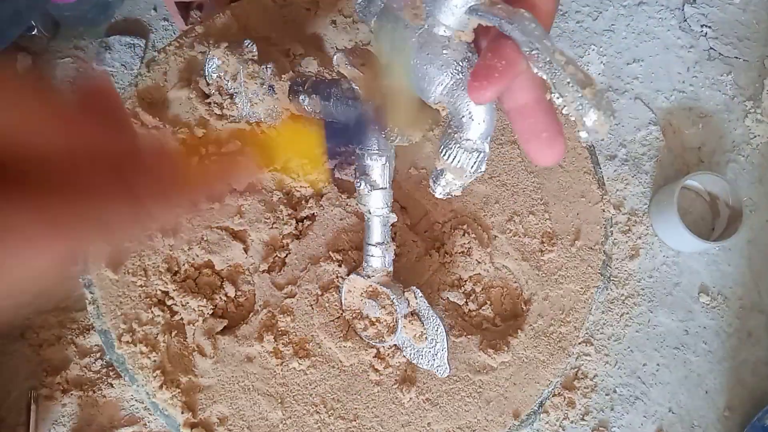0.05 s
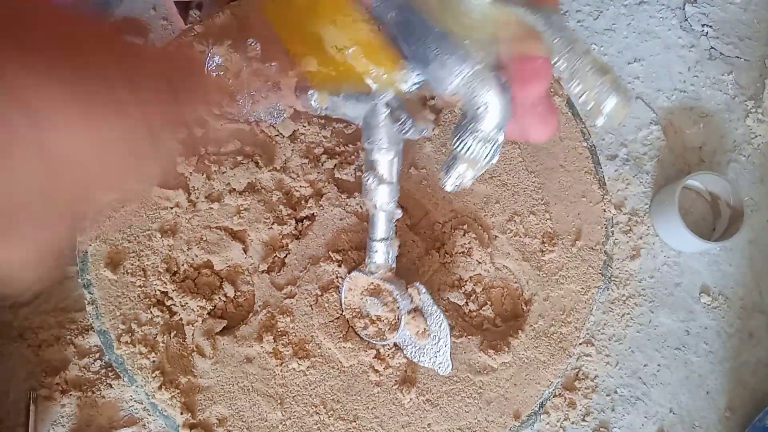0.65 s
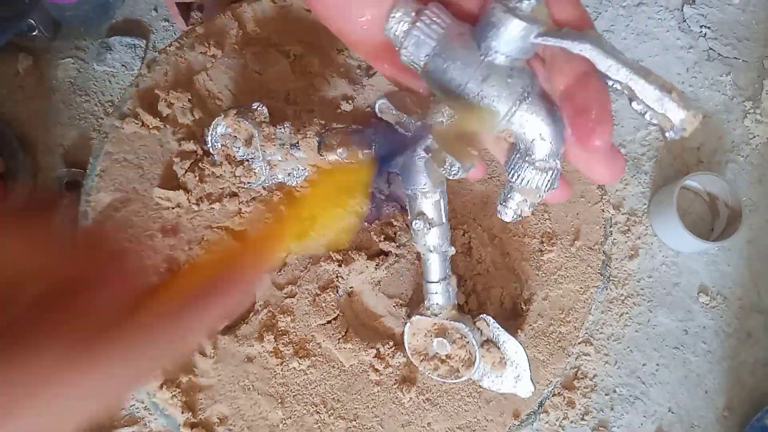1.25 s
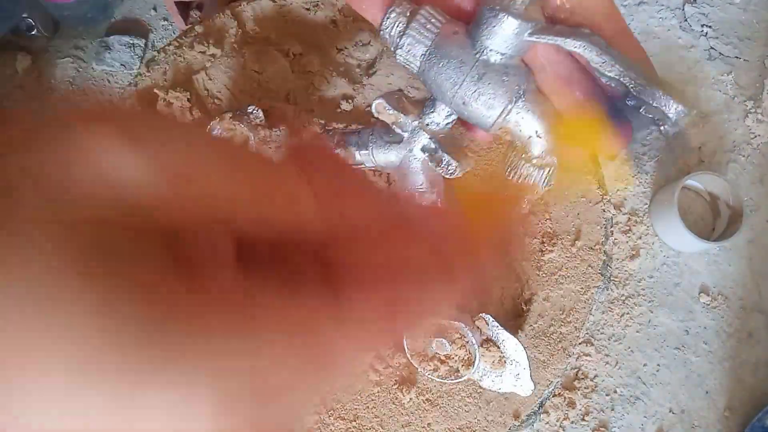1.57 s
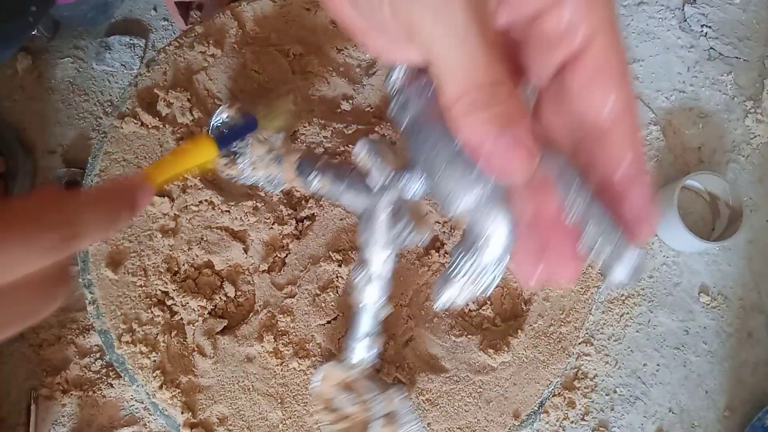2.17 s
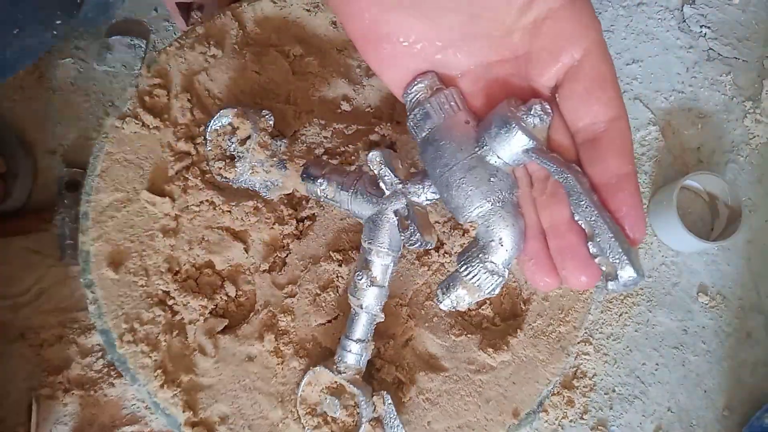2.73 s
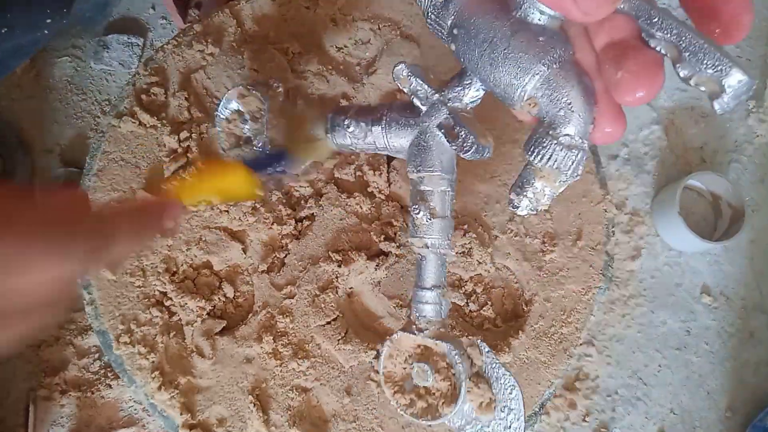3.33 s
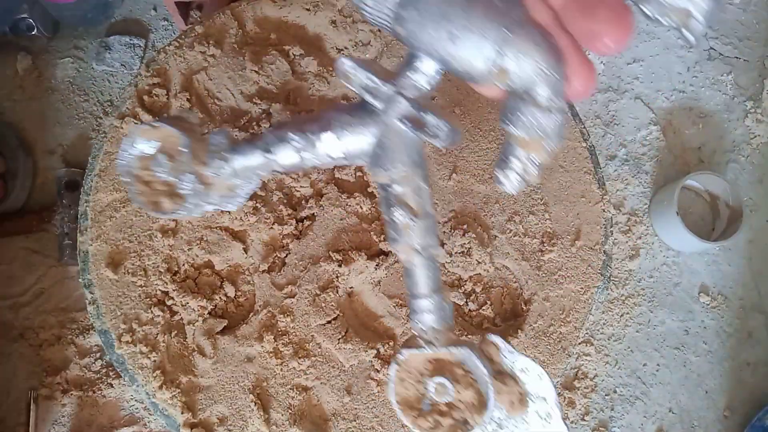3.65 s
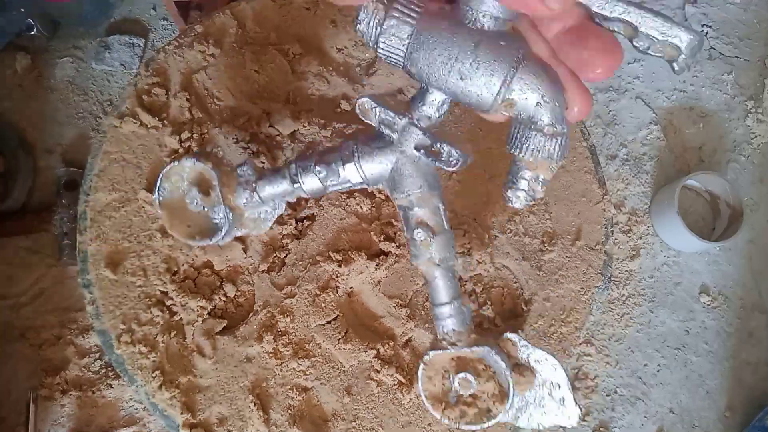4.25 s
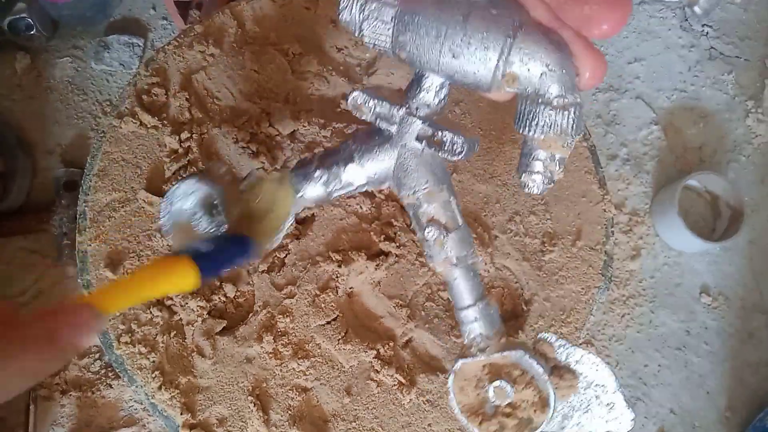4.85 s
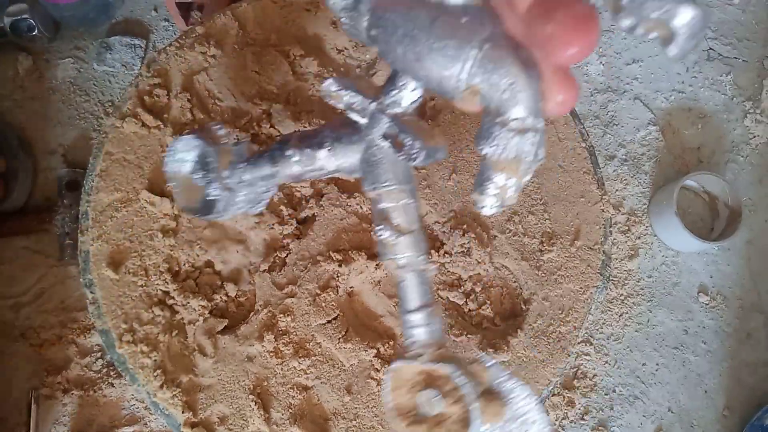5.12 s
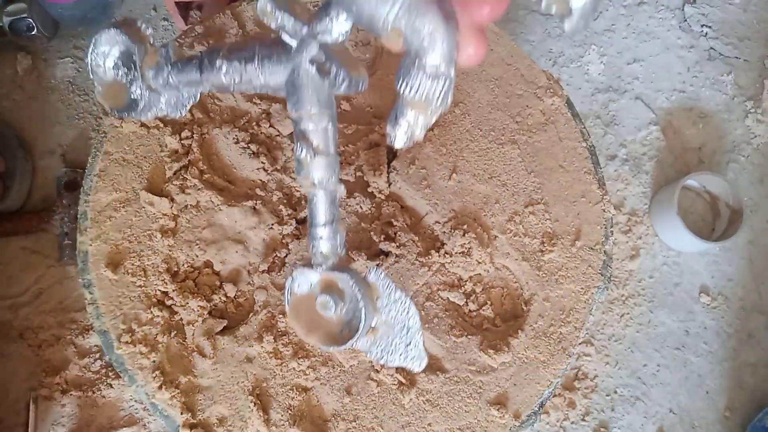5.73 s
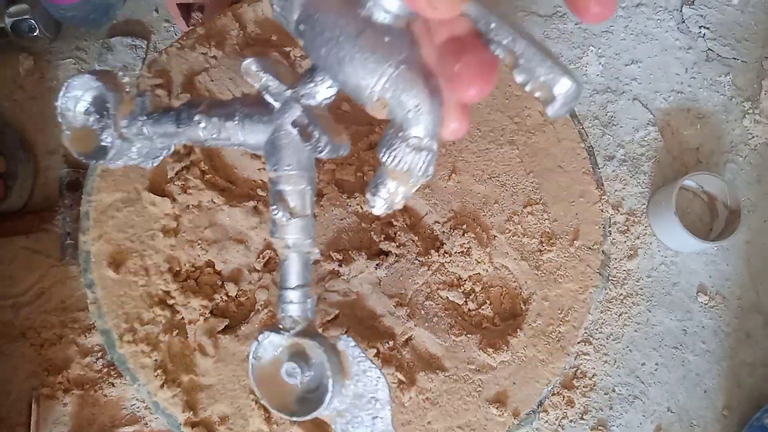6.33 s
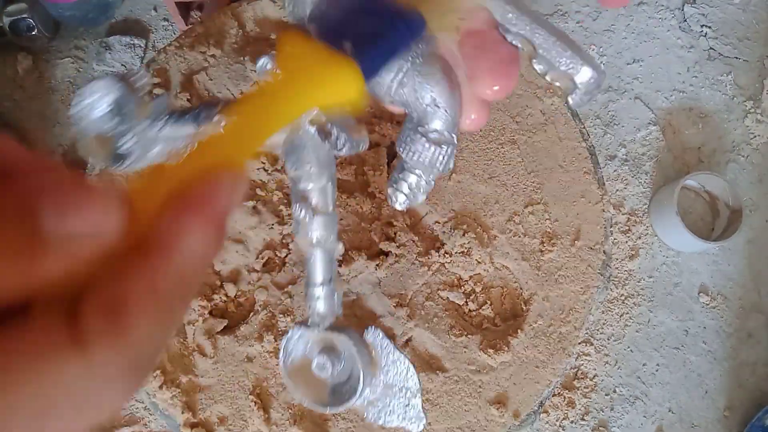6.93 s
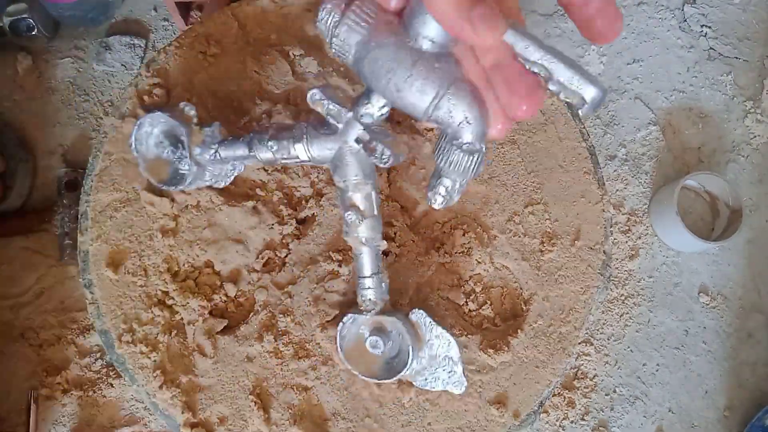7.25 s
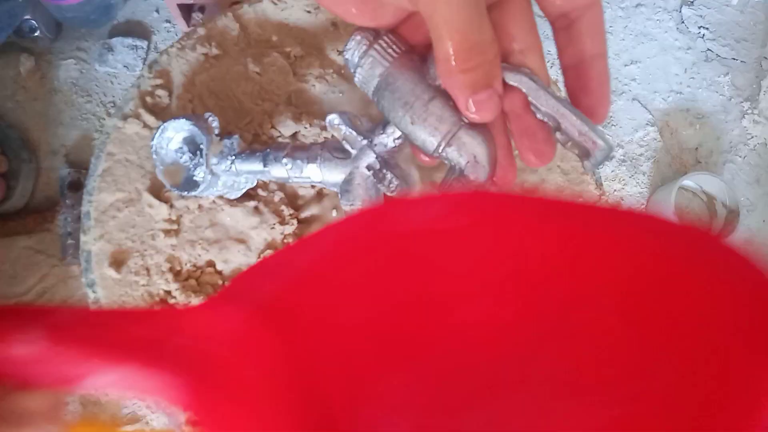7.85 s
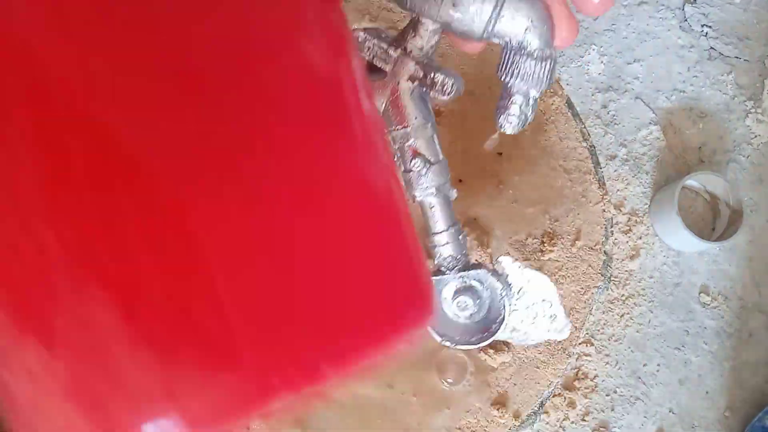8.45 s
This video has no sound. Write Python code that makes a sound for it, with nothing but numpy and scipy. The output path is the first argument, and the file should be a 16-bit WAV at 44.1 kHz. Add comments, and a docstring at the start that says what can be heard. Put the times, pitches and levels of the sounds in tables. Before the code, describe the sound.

In a small workshop, short hollow sloshes and sharp plastic knocks come again and again as a paintbrush is rinsed in a water jug. Between the dunks, its wet bristles softly rasp and flick sand off a metal casting, with a few light taps. A faint far drone rises late, and water finally splashes gently onto the casting, dripping and trickling. Everything is close and slightly muffled, over low hiss and rumble.

```python
"""A paintbrush washes moulding sand off an aluminium casting held over the sand bed.
From the start, wet bristles tap and scrub the metal, dragging grit. From 0.5 s the brush is dunked
again and again in a plastic jug, knocking the wall and churning the water, with scrubbing in between.
A far drone swells near 7 s. From 7.4 s water from the jug spatters on the casting and trickles off.
Faint hiss and rumble run throughout."""
import sys
import numpy as np
from scipy import signal
from scipy.fft import rfft, irfft, next_fast_len
from scipy.io import wavfile

SR = 44100
rng = np.random.default_rng(int(sys.argv[2]) if len(sys.argv) > 2 else 0)


def write(x):
    x = np.atleast_2d(x).T
    wavfile.write(sys.argv[1], SR, np.round(np.clip(x, -1, 1) * 32767).astype(np.int16))


N = 382788
TIME_S = np.arange(N) / SR

# Event levels are before mix gains.
# Brush churns the water. Each row: start in seconds, level in dB, rise in seconds, t60 in seconds,
# air note in Hz, relative level of spray and bubbles in dB.
DUNKS = [(0.471, -26.5, 0.022, 0.16, 540, -14), (.515, -29.5, 0.012, 0.21, 535, -2.5),
         (1.112, -21.5, 0.014, 0.3, 639, -10), (1.862, -26.5, 0.0047, 0.16, 720, -28),
         (1.883, -16, 0.0053, 0.18, 677, -6), (1.939, -30, 0.021, 0.19, 565, -10),
         (2.855, -30.5, 0.015, 0.31, 626, -8), (2.922, -28, 0.01, 0.25, 668, -3.5),
         (3.664, -18.5, 0.0035, 0.19, 733, -12), (3.718, -25, 0.0036, 0.29, 615, -3.5),
         (4.397, -37.5, 0.015, 0.22, 594, -5), (4.42, -29, 0.009, 0.34, 670, -9.5),
         (5.249, -34.5, 0.019, 0.22, 680, -13), (5.789, -33.5, 0.0024, 0.26, 674, -32),
         (5.83, -32.5, 0.033, 0.23, 680, -10), (6.366, -20.5, 0.01, 0.24, 606, -7),
         (7.295, -38, 0.026, 0.36, 621, -7.5)]
# Ferrule hits the jug. Each row: start in seconds, crack peak in dB, pitch in Hz, boom re crack in dB.
KNOCKS = [(0.4736, -21, 2140, -20), (0.5146, -8, 2010, -18.5), (1.8841, -10.5, 2090, -37),
          (1.889, -14.5, 2670, 2.5), (1.9052, -14.5, 3180, -18), (2.8552, -17.5, 1960, -10),
          (2.9193, -7.5, 3745, -11), (3.662, -4, 2940, -13), (5.2432, -23, 3080, -25),
          (5.833, -21, 3630, -25), (5.848, -17.5, 2800, -12.5), (6.3646, -6.5, 2940, -8.5),
          (6.3773, -17.5, 1860, -7)]
# Large bubbles. Each row: start in seconds, level in dB, pitch in Hz, t60 in seconds.
GULPS = [(.517, -27, 488, 0.058), (1.138, -28, 600.4, 0.19), (1.891, -23, 713, 0.05),
         (2.925, -18, 773, 0.014), (3.721, -22, 616, 0.22), (4.428, -28.5, 538, 0.16),
         (6.39, -30, 612.4, 0.2)]
# Half-full plastic jug. Each row: mode frequency in Hz, gain in dB, t60 in seconds.
JUG_MODES = [(241.6, -27.5, 0.17), (350.6, 0, 0.054), (548, -8.5, 0.059), (686, 2.5, 0.011),
             (728, 3, 0.072), (836, -12, 0.036), (1202, -2.5, 0.03), (1780, 0, 0.021), (1980, -3.5, 0.037),
             (2535, -27.5, 0.13), (2580, -32, 0.067), (3495, -2, 0.022), (3790, -8, 0.11),
             (1327, -6.5, 0.057), (4210, -10.5, 0.025)]
# Hollow jug notes. Each row: centre in seconds, half-width in seconds, level in dB, pitch in Hz,
# bandwidth in Hz.
JUG_NOTES = [(2.81, .075, -56, 620, 110), (7.885, .055, -44.5, 158, 22)]
# Scrubbing. Each row: start in seconds, length in seconds, then bristle, sand and rub levels in dB.
SCRUB_BOUTS = [(-.05, 0.42, -56, -49.5, -60.5), (0.614, 0.38, -53.5, -44.5, -54),
               (1.287, 0.48, -51.5, -51.5, -51), (2.027, .66, -52, -46, -57),
               (3.039, 0.473, -51.5, -44.5, -57.5), (3.86, 0.38, -52.5, -49.5, -52),
               (4.51, 0.38, -50, -44, -59.5), (4.862, .21, -53, -44, -58.5), (5.399, 0.35, -50.5, -45, -67),
               (5.968, .3, -51, -41.5, -55), (6.505, 0.72, -50.5, -46.5, -51.5)]
# Bristle flicks. Each row: centre in seconds, level in dB, length in seconds, pitch in Hz,
# sand re rasp in dB.
FLICKS = [(0.829, -39.5, 0.022, 3470, 8), (0.96, -33.5, 0.013, 3770, 9.5), (1.405, -41.5, 0.038, 2620, 5),
          (1.515, -32.5, 0.048, 2700, -27), (1.702, -41.5, 0.028, 2000, -5), (2.334, -43, .022, 3140, -4),
          (2.274, -41.5, .01, 2870, 0), (2.382, -39, 0.013, 3070, -5), (2.427, -35.5, 0.016, 3530, -13),
          (2.473, -37, 0.014, 3930, -3), (3.298, -41.5, 0.026, 3100, -15), (3.535, -42, .017, 3450, 4),
          (3.455, -52.5, .02, 3100, 3), (4.074, -43.5, 0.027, 3700, -5), (4.239, -44.5, 0.027, 3160, 0),
          (4.686, -33.5, 0.0055, 3830, 11), (4.965, -33.5, .012, 3020, 0), (5.014, -34, 0.017, 3380, -6),
          (6.054, -34.5, 0.011, 3750, 9), (6.151, -43, 0.034, 3040, -8), (6.221, -39.5, 0.011, 3280, 0),
          (6.89, -38, 0.01, 3000, -6), (6.968, -37.5, 0.01, 3850, 3), (7.1, -38, 0.014, 3570, 0)]
# Brush taps the casting. Each row: start in seconds, peak in dB, pitch in Hz, t60 in seconds.
TAPS = [(.036, -12, 1790, 0.0037), (.037, -27.5, 725, 0.027), (1.4452, -17, 840, 0.021),
        (1.4455, -15.5, 1930, 0.009), (1.699, -25, 1200, 0.007), (4.832, -38.5, 1096, .03),
        (5.012, -32, 3300, 0.015), (5.516, -27.5, 2350, 0.0046)]
# Brush swings. Each row: start in seconds, level in dB, first and last pitch in Hz.
SWINGS = [(.375, -54.5, 5030, 3820), (.636, -58, 4270, 3140), (1.06, -54.5, 5000, 4030),
          (1.305, -52, 3200, 4200), (1.762, -58, 4740, 3540), (3.01, -55, 4240, 4020),
          (3.305, -53, 3580, 4200), (3.559, -57, 4830, 3570), (3.725, -53, 3740, 2800),
          (4.319, -57, 5000, 3800), (4.473, -51.5, 4500, 3800), (5.142, -55, 5100, 3660),
          (5.48, -54, 3620, 4400)]
# Water on the casting. Each row: start in seconds, level in dB, t60 in seconds, bubbles re spatter in dB.
GUSHES = [(7.436, -58.5, 0.64, 6.5), (7.782, -51.5, 0.71, 0), (7.895, -47, 0.23, -9),
          (8.031, -44.5, 0.26, -6), (8.201, -41.5, 0.097, -13), (8.365, -47, 0.13, -20),
          (8.515, -51, 0.21, -18)]
# Drops on the metal. Each row: start in seconds, level in dB, mid-glide pitch in Hz, t60 in seconds.
DROPS = [(4.6856, -25.5, 2370, 0.021), (7.437, -44.5, 3040, 0.029), (7.462, -35.5, 2880, 0.0048),
         (7.782, -37, 2770, 0.037), (7.8, -43, 2340, 0.035), (7.839, -38.5, 947, 0.031),
         (7.865, -48, 1600, .04), (8.04, -44, 3720, 0.038), (8.075, -35, 3570, 0.02),
         (8.186, -33, 3520, 0.017), (8.2047, -23.5, 3020, 0.022), (8.4033, -28.5, 3900, 0.0027),
         (8.522, -37, 3050, 0.046)]
# Rumble envelope. Each row: time in seconds, level in dB.
RUMBLE_ENVELOPE = [(0, -63.5), (1.05, -56), (1.8, -58), (2.7, -66.5), (4.2, -65.5), (4.62, -58),
                   (5.15, -65), (6.1, -59.5), (7.6, -57.5), (8.2, -52), (8.68, -52.5)]
# Source spectra and microphone response. Each row: frequency in Hz, gain in dB.
SPRAY_SPECTRUM = [(80, -34), (170, -14.5), (330, 18), (600, 6.5), (1000, -4.5), (1250, -6), (1500, -28),
                  (1950, 15.5), (2400, 10.5), (3000, 17.5), (4200, -1.5), (6000, -18), (15000, -12.5)]
CRACK_SPECTRUM = [(80, -44.5), (250, 6.5), (900, -15.5), (1600, 15), (4200, 10), (7000, -3.5), (15000, -21)]
BRISTLE_SPECTRUM = [(200, -21), (450, -8.5), (900, -11.5), (1500, -11.5), (2300, -5.5), (3400, -3.5),
                    (4300, -5.5), (5500, -22), (7000, -19.5), (15000, -31.5)]
SAND_SPECTRUM = [(2000, -30.5), (4300, 5), (5500, 3.5), (7000, 1), (9000, 1), (15000, 8)]
DULL_SPECTRUM = [(40, -24.5), (120, -10), (220, 3.5), (400, -2), (600, -3), (1000, -4.5), (2000, -14),
                 (4000, -34.5), (6000, -27.5), (15000, -7)]
RUMBLE_SPECTRUM = [(15, -6.5), (35, -17), (62, 2.5), (85, -3.5), (120, -9.5), (250, -17), (1000, -35)]
MIC_RESPONSE = [(3900, 1.5), (4400, -3.5), (5000, -6.5), (5600, -13), (6500, -14), (7900, -29),
                (10000, -30.5), (13300, -28), (15500, -35)]
# Workshop decay. Each row: frequency in Hz, t60 in seconds.
ROOM_DECAY = [(200, 0.51), (550, 0.38), (1400, 0.21), (3700, 0.14), (9000, 0.074)]


def dunks(boom_width_hz=290, air_width_hz=45, air_build_s=0.011, wall_width_hz=70):
    """Churned water drives the jug's air: a broad boom settles on one note. Bristles rub the wall."""
    out, t = np.zeros(N), np.arange(SR // 3) / SR
    for start_s, db, rise_s, t60_s, hz, wet_db in DUNKS:
        boom = noise_band(grit(len(t), 4000, 3.6), hz, boom_width_hz)
        air = unit_rms(resonate(boom, 0.97 * hz, air_width_hz)) * building(t, air_build_s)
        spray = coloured(grit(len(t), 3000, 1.5), SPRAY_SPECTRUM)
        rub = grit(len(t), 4000, 3.5)
        wall = unit_rms(sum(gain(mode_db) * resonate(rub, mode_hz, wall_width_hz)
                            for mode_hz, mode_db, _ in jug_modes(spread=0.062)))
        pops = bubbles(len(t), per_s=350, low_hz=1100, high_hz=4200, cycles=24, sizes=12)
        jug = gain(-7) * boom + gain(-12) * air + gain(-9) * wall
        wet = gain(wet_db) * (gain(-6) * spray + gain(-12) * pops)
        add(out, start_s, gain(db) * burst(t, rise_s, t60_s) * (jug + wet))
    return out


def knocks(build_s=0.0012, thud_hz=270, thud_t60_s=0.013):
    """The ferrule cracks on plastic; the wall flexes against the water and the jug's modes build up."""
    out, t = np.zeros(N), np.arange(SR // 4) / SR
    for start_s, db, hz, boom_db in KNOCKS:
        modes = sum(gain(mode_db) * np.sin(2 * np.pi * (mode_hz * t + rng.random())) * dying(t, t60_s)
                    for mode_hz, mode_db, t60_s in jug_modes(spread=0.035))
        boom = gain(boom_db) * unit_peak(modes * building(t, build_s))
        thud = gain(-21) * np.sin(2 * np.pi * thud_hz * t) * dying(t, thud_t60_s)
        crack = click(hz, t60_s=0.016, edge_gain=1.3, partial_gain=0.44)
        add(out, start_s, gain(db) * crack)
        add(out, start_s, gain(db) * (thud + boom))
    return out


def jug_modes(spread):
    """Moving water detunes each mode of the jug at random."""
    return [(hz * (1 + spread * rng.standard_normal()), db, t60_s) for hz, db, t60_s in JUG_MODES]


def gulps(rise_s=0.0017, throb_db=3, detune=0.013):
    """An air pocket closes behind the brush and rings as one bubble, jostled by the slosh."""
    out, t = np.zeros(N), np.arange(SR // 3) / SR
    for start_s, db, hz, t60_s in GULPS:
        throb, sway = waver(50, len(t)), waver(40, len(t))
        ring = unit_peak(sine(hz * (1 + detune * sway)) * building(t, rise_s) * dying(t, t60_s))
        add(out, start_s, gain(db + throb_db * throb) * ring)
    return out


def jug_air():
    """Soft, wandering hollow notes as the brush nears the water and as the jug is lifted to pour."""
    out = np.zeros(N)
    for centre_s, half_width_s, db, hz, width_hz in JUG_NOTES:
        wandering_hz = hz + width_hz / 2 * waver(2 * width_hz)
        out += gain(db) * bell(centre_s, half_width_s) * unit_rms(sine(wandering_hz))
    return out


def scrubbing(land_s=0.045, lift_s=0.064, strokes_per_s=12, stroke_db=3.5, flutter_db=3):
    """Wet bristles land, catch and slip in quick strokes, drag sand over the metal and lift off."""
    bristle_env, sand_env, rub_env = np.zeros((3, N))
    for start_s, length_s, bristle_db, sand_db, rub_db in SCRUB_BOUTS:
        span = slice(max(int(start_s * SR), 0), int((start_s + length_s + lift_s) * SR))
        t = TIME_S[span] - start_s
        contact = np.clip(t / land_s, 0, 1) * np.clip((length_s - t) / lift_s + 0.5, 0, 1)
        pressure = np.sin(np.pi * np.clip(t / length_s, 0, 1) ** 1.6)  # peaks after mid-bout
        ease_db = -4 * (1 - pressure)
        bristle_env[span] += contact * gain(bristle_db + 0.38 * ease_db)
        sand_env[span] += contact * gain(sand_db + ease_db)
        rub_env[span] += contact * gain(rub_db)
    stroke = gain(stroke_db * sine(strokes_per_s * (1 + 0.196 * waver(3.9))))
    bristles = bristle_env * stroke * coloured(grit(N, 16000, 0.8), BRISTLE_SPECTRUM)
    grains = grit(N, 9900, 1.2) + gain(-9) * grit(N, 90, 4)  # fine + coarse
    sand = gain(1) * sand_env * stroke ** 1.06 * coloured(grains, SAND_SPECTRUM)
    rub = rub_env * coloured(rng.standard_normal(N), DULL_SPECTRUM) * gain(1.7 * waver(12))
    return (bristles + sand) * gain(flutter_db * waver(66)) + rub


def flicks(width_hz=1900):
    """A tuft springs off an edge in one short rasp and throws sand."""
    out, count = np.zeros(N), SR // 8
    t = (np.arange(count) - count / 2) / SR
    for centre_s, db, length_s, hz, sand_db in FLICKS:
        rasp = unit_rms(resonate(grit(count, 5000, 1.1), hz, width_hz))
        sand = gain(sand_db) * coloured(grit(count, 2800, 3), SAND_SPECTRUM)
        swish = gain(-11) * coloured(grit(count, 4500, 0.91), BRISTLE_SPECTRUM)
        spread_s = length_s * np.where(t < 0, 0.75, 1.25)  # fast onset, slower decay
        envelope = np.exp(-(2 * t / spread_s) ** 2)
        add(out, centre_s + t[0], gain(db) * envelope * (rasp + sand + swish))
    return out


def taps(scatter_t60_s=0.014):
    """The brush taps the hand-held casting: a damped ring trailed by finer contacts."""
    out, t = np.zeros(N), np.arange(SR // 20) / SR
    for start_s, db, hz, t60_s in TAPS:
        contacts = 0.14 * grit(len(t), 2500, 1) * dying(t, scatter_t60_s)
        contacts[0] = 1  # main hit
        ring = click(hz, t60_s, edge_gain=0.81, partial_gain=0.38)
        add(out, start_s, gain(db) * unit_peak(signal.fftconvolve(contacts, ring)))
    return out


def swings(length_s=0.099, width_hz=1600):
    """A thin hiss glides in pitch as the wet brush swings."""
    out, count = np.zeros(N), int(length_s * SR)
    for start_s, db, first_hz, last_hz in SWINGS:
        noise = grit(SR // 4, 2500, 1)[:count]
        baseband = lowpass(signal.hilbert(noise), width_hz / 2)
        turns = np.cumsum(np.linspace(first_hz, last_hz, count)) / SR
        hiss = unit_rms((baseband * np.exp(2j * np.pi * turns)).real)
        add(out, start_s, gain(db) * hiss * signal.windows.tukey(count, 0.6))
    return out


def pouring(spatter_hz=3300, width_hz=2300, rise_s=0.009):
    """Each gush spatters on the metal, rinses off sand and breaks into bubbles."""
    out, t = np.zeros(N), np.arange(SR // 3) / SR
    for start_s, db, t60_s, bubble_db in GUSHES:
        spatter = noise_band(grit(len(t), 3000, 1.5), spatter_hz, width_hz)
        sand = gain(-2) * coloured(grit(len(t), 2800, 3), SAND_SPECTRUM)
        pops = bubbles(len(t), per_s=200, low_hz=1400, high_hz=4500, cycles=30, sizes=24)
        add(out, start_s, gain(db) * burst(t, rise_s, t60_s) * (spatter + sand + gain(bubble_db) * pops))
    return out


def drops(rise_s=0.0004, climb=0.11, spatter_t60_s=0.073):
    """Each drop traps a bubble on the wet metal: a tick, a rising ring and fine spatter."""
    out, t = np.zeros(N), np.arange(SR // 10) / SR
    tick = 0.13 * unit_peak(impulse(CRACK_SPECTRUM))
    for start_s, db, hz, t60_s in DROPS:
        turns = hz * t * (1 + climb * (np.minimum(t / t60_s, 1) - 0.5))
        ring = unit_peak(np.sin(2 * np.pi * turns) * building(t, rise_s) * dying(t, t60_s))
        spatter = coloured(grit(len(t), 3000, 1.3), CRACK_SPECTRUM) * dying(t, spatter_t60_s)
        add(out, start_s, gain(db) * (ring + gain(-15) * spatter))
        add(out, start_s, gain(db) * tick)
    return out


def bubbles(count, per_s, low_hz, high_hz, cycles, sizes):
    """Small bubbles of many sizes ring briefly and rise in pitch."""
    out = np.zeros(count)
    for hz in np.geomspace(low_hz, high_hz, sizes):
        age_cycles = np.arange(int(cycles * SR / hz)) * hz / SR
        ring = np.sin(2 * np.pi * age_cycles * (1 + age_cycles / cycles)) * dying(age_cycles, cycles)
        pops = (rng.random(count) < per_s / sizes / SR) * rng.exponential(1, count)
        for at in np.flatnonzero(pops):
            add(out, at / SR, pops[at] * ring)
    return unit_rms(out)


def runoff(centre_s=8.41, half_width_s=0.44):
    """A fine trickle runs off the casting onto the sand."""
    droplets = gain(-60) * coloured(grit(N, 2500, 1.5), BRISTLE_SPECTRUM)
    grains = gain(-53) * coloured(grit(N, 1500, 2), SAND_SPECTRUM)
    return bell(centre_s, half_width_s) * hand_echo(droplets + grains) * gain(2.1 * waver(14))


def hand_echo(x, median_delay_s=0.000788):
    """Reflection off the moving hand: a soft, sweeping comb filter."""
    delay_s = median_delay_s * np.exp(0.345 * waver(5.9))
    return x + 0.41 * np.interp(TIME_S - delay_s, TIME_S, x)


def room(x, echoes_per_s=3000, predelay_s=0.004):
    """Workshop reflections; the treble dies first."""
    count = SR // 2
    echoes = rng.choice([-1., 1.], count) * (rng.random(count) < echoes_per_s / SR)
    echoes *= np.arange(count) > predelay_s * SR
    hz, t, bands = signal.stft(echoes, SR, nperseg=256)
    tail = signal.istft(bands * dying(t, lookup(ROOM_DECAY, hz)[:, None]), SR, nperseg=256)[1]
    return signal.oaconvolve(x, tail / np.linalg.norm(tail))[:N]


def background(hum_hz=162, hum_width_hz=22):
    """Faint hiss and rumble; dull far-off noise and a low hum swell together late."""
    dull_noise, hum_noise, rumble_noise, mid_noise, high_noise = rng.standard_normal((5, N))
    mid_hiss = gain(-63) * coloured(mid_noise, BRISTLE_SPECTRUM)
    high_hiss = gain(-62) * coloured(high_noise, SAND_SPECTRUM)
    hiss = hand_echo(mid_hiss + high_hiss)
    murk = coloured(dull_noise, DULL_SPECTRUM) * gain(1.3 * waver(15))
    drone = gain(-50) * bell(centre_s=7.06, half_width_s=0.86) * lowpass(murk, 4200)
    hum_env = gain(-73) + gain(-56) * bell(centre_s=7.22, half_width_s=0.95)
    hum = hum_env * noise_band(hum_noise, hum_hz, hum_width_hz)
    rumble_db = np.interp(TIME_S, *np.transpose(RUMBLE_ENVELOPE))
    rumble = gain(rumble_db) * coloured(rumble_noise, RUMBLE_SPECTRUM)
    return hiss + gain(-58.5) * murk + drone + hum + rumble


def click(hz, t60_s, edge_gain, partial_gain):
    """Hard contact: a wide-band edge, a short ring and two weaker inharmonic partials."""
    edge = unit_peak(impulse(CRACK_SPECTRUM))
    t = np.arange(len(edge)) / SR
    ratios = 1, rng.uniform(0.6, 0.78), rng.uniform(1.22, 1.45)
    main, lower, upper = (np.sin(2 * np.pi * hz * ratio * t) for ratio in ratios)
    return unit_peak(edge_gain * edge + (main + partial_gain * (lower + upper)) * dying(t, t60_s))


def grit(count, per_s, spread_db):
    """Tiny random impacts of uneven size, rms 1."""
    hits = rng.random(count) < per_s / SR
    size = np.minimum(rng.standard_exponential(count, np.float32), 4)
    push = rng.standard_normal(count, np.float32)
    return unit_rms(np.where(hits, gain(spread_db * size) * push, np.zeros(count)))


def waver(rate_hz, count=N):
    """Random drift below rate_hz, rms 1."""
    step = 32
    size = next_fast_len(count // step + 2, True)
    passband = np.fft.rfftfreq(size, step / SR) < rate_hz
    slow = irfft(rfft(rng.standard_normal(size)) * passband, size)
    return np.interp(np.arange(count), step * np.arange(size), unit_rms(slow))


def sine(hz):
    """Oscillator with per-sample frequency."""
    return np.sin(2 * np.pi * np.cumsum(hz) / SR)


def building(t, time_constant_s):
    """Exponential rise to 1."""
    return 1 - np.exp(-t / time_constant_s)


def dying(t, t60):
    """Falls 60 dB per t60."""
    return np.exp(-np.log(1000) * t / t60)


def burst(t, rise_s, t60_s):
    """Linear rise, exponential decay."""
    return np.minimum(t / rise_s, 1) * dying(np.maximum(t - rise_s, 0), t60_s)


def bell(centre_s, half_width_s):
    """Gaussian swell."""
    return np.exp(-((TIME_S - centre_s) / half_width_s) ** 2)


def lookup(table, hz):
    """Interpolates on a log-frequency axis."""
    table_hz, values = np.transpose(table)
    return np.interp(np.log(hz + 1), np.log(table_hz), values)


def impulse(spectrum, size=2048):
    """Minimum-phase impulse with the given spectrum."""
    log_gain = np.log(gain(lookup(spectrum, abs(np.fft.fftfreq(size, 1 / SR)))))
    return np.fft.ifft(np.exp(np.conj(signal.hilbert(log_gain)))).real


def coloured(x, spectrum):
    """Filters by a spectrum table, rms 1."""
    return unit_rms(signal.oaconvolve(x, impulse(spectrum))[:len(x)])


def resonate(x, hz, width_hz):
    """One resonance."""
    return signal.lfilter(*signal.iirpeak(hz, hz / width_hz, SR), x)


def noise_band(x, hz, width_hz):
    """Two equal resonances in series, rms 1."""
    return unit_rms(resonate(resonate(x, hz, width_hz), hz, width_hz))


def lowpass(x, edge_hz):
    """Second-order treble cut."""
    return signal.lfilter(*signal.butter(2, edge_hz, fs=SR), x)


def thin(x, edge_hz=170):
    """Small objects radiate no deep bass."""
    return signal.sosfilt(signal.butter(3, edge_hz, "highpass", fs=SR, output="sos"), x)


def gain(db):
    """dB to amplitude."""
    return 10 ** (np.asarray(db) / 20)


def unit_rms(x):
    """Scales to rms 1."""
    return x / np.sqrt(np.mean(x ** 2) + 1e-20)


def unit_peak(x):
    """Scales to peak 1."""
    return x / abs(x).max()


def add(mix, start_s, sound):
    """Sums a sound into the mix."""
    part = mix[max(round(start_s * SR), 0):][:len(sound)]
    part += sound[:len(part)]


def scene():
    """Casting close by, jug to one side with slightly more room sound; mono."""
    tapping = taps()
    brushing = gain(-3.5) * hand_echo(scrubbing() + flicks()) + gain(-1) * swings()
    casting = brushing + thin(tapping + drops()) + pouring() + runoff()
    jug = thin(knocks()) + dunks() + gulps() + jug_air()
    echoes = room(gain(-14) * casting + gain(-13.5) * jug)
    return (casting + jug + echoes + background())[None]


def record(dry, edge_hz=15600):
    """Dull microphone, falling above 4 kHz, then a band limit."""
    dull = signal.oaconvolve(dry[0], impulse(MIC_RESPONSE))[:N]
    band_limit = signal.firwin(511, edge_hz, window=("kaiser", 9), fs=SR)
    return signal.oaconvolve(dull, band_limit, "same")[None]


dry = scene()
out = record(dry)
write(out)
```